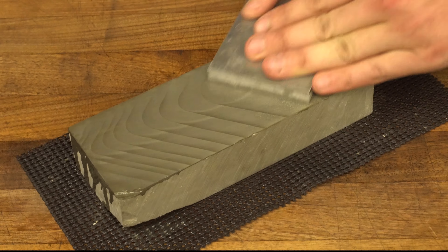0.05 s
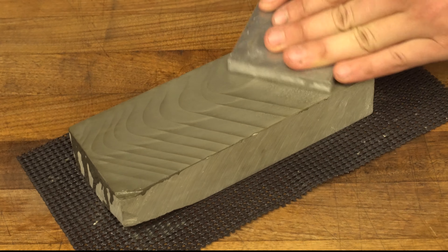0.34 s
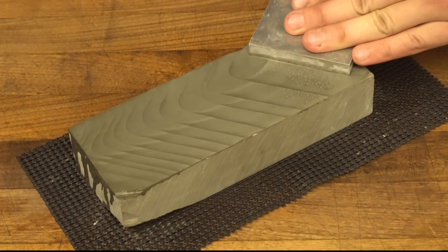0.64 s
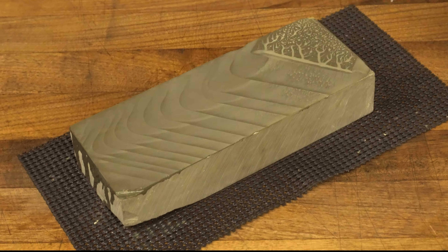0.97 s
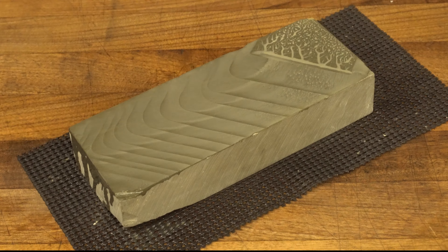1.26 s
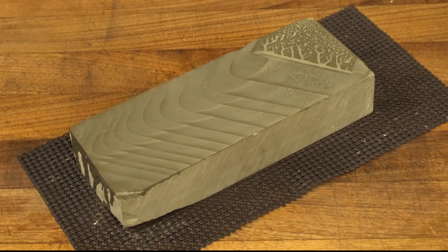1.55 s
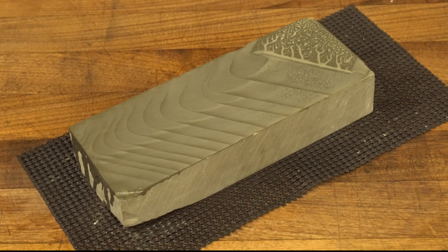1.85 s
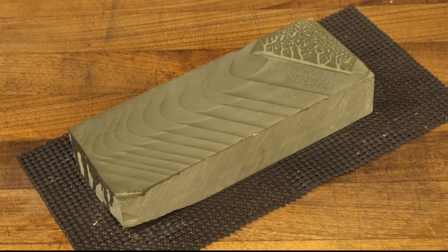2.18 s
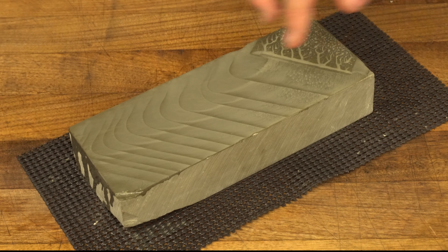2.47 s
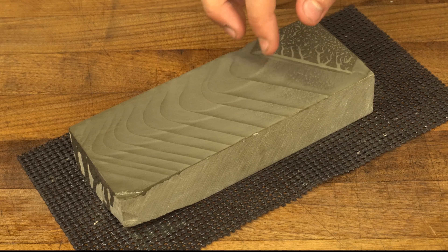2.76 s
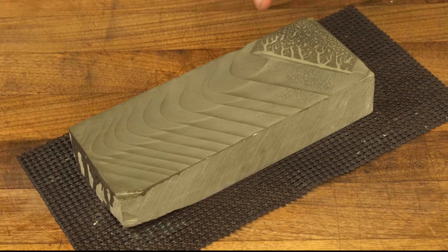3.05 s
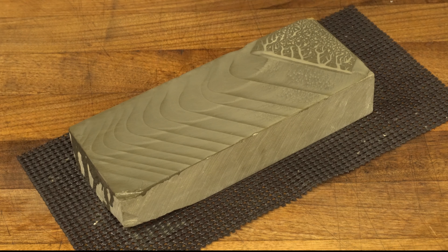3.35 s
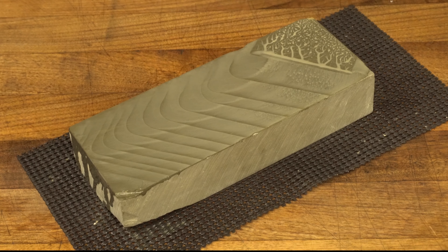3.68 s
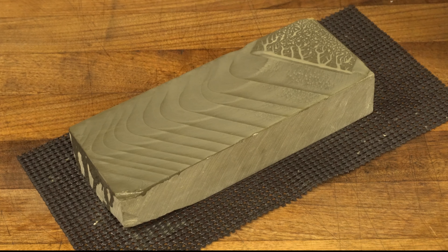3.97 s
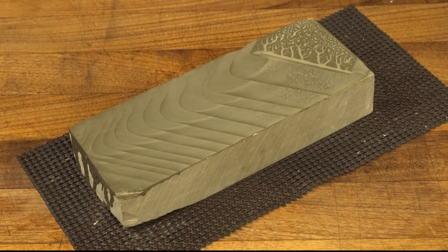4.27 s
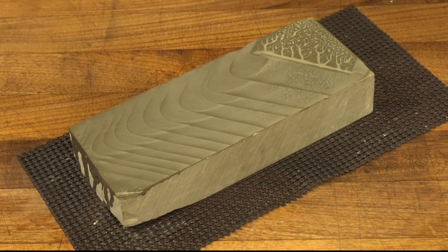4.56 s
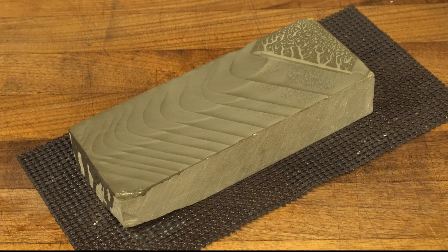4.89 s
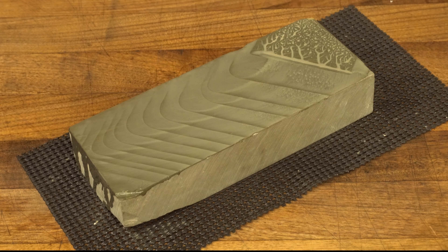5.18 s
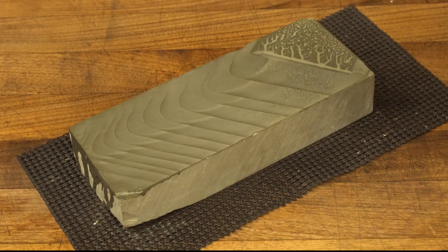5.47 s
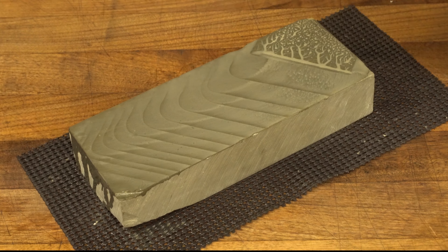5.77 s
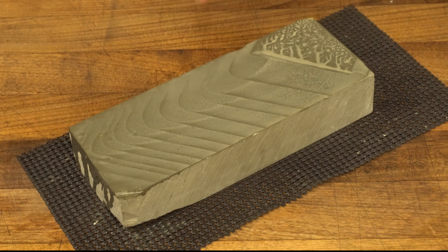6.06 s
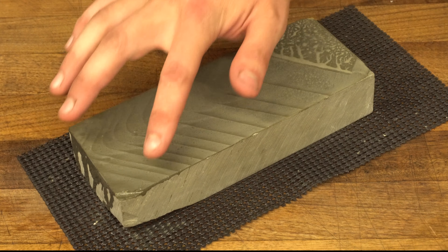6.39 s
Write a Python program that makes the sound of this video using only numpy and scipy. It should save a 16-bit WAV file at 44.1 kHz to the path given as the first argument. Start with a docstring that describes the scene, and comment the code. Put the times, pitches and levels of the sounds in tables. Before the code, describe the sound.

Close up in a small room, a slab is rubbed over a wet whetstone in three quick, gritty strokes and lifted off. After a pause, two knocks set it down on a wooden bench. Later something heavier lands with a thud and rocks quickly to rest. A light shuffle, small wet clicks and a short, sputtering hiss follow, over faint room noise.

```python
"""A small room, close to a wooden bench. A small slab is rubbed in slurry on a whetstone for three short
strokes and lifted off; crushed grit excites the hollows beneath it. Two knocks set it down, ringing the
bench's modes. Something heavier follows, rocks to rest and sets the bench swaying. Then come a light
shuffle, a run of small clicks as wet films part, and a short, sputtering hiss."""
import sys
import numpy as np
from scipy import signal
from scipy.io import wavfile
from scipy.ndimage import uniform_filter1d

SR = 44100
rng = np.random.default_rng(int(sys.argv[2]) if len(sys.argv) > 2 else 0)


def to_wav(sig):
    """Store sig (one row per channel, or 1-D mono) as 16-bit WAV at the path in sys.argv[1].

    Samples outside -1..1 are clipped; the rate is SR.
    """
    pcm = np.clip(np.atleast_2d(sig), -1, 1) * 32767
    pcm = np.round(pcm).astype(np.int16)
    wavfile.write(sys.argv[1], SR, pcm.T)  # frames by channels


N = 283563
T = np.arange(N) / SR

# Spectra of the room's air and of a low rumble. Each row: frequency in Hz, relative density in dB.
AIR_SPECTRUM = [(88, -15.5), (150, -5.5), (221, -6.5), (267, -0.5), (337, -7.5), (401, -5), (477, -15),
                (535, 0), (624, -25.5), (687, -16), (1010, -3.5), (1670, -17.5), (2230, -15.5), (2700, -19),
                (11500, -46.5), (15000, -58)]
RUMBLE_SPECTRUM = [(18, -15), (30, -2.5), (48, 3.5), (62, 4), (75, -7), (100, -5.5), (140, -9.5),
                   (250, -12), (500, -55)]
# The slow ebb of the rumble. Each row: time in seconds, relative level in dB.
RUMBLE_EBB = [(0, -55.5), (.85, -52), (1.2, -55), (3.5, -60.5), (4.4, -60.5), (6.2, -59)]
# Broad tones in the air. Each row: frequency in Hz, width in Hz, level in dB.
AIR_TONES = [(528, 62, -77.5), (968, 21, -82)]
# Reverberation of the room. Each row: frequency in Hz, time to decay by 60 dB (t60) in seconds.
ROOM_DECAY = [(100, 0.83), (300, 0.56), (1000, 0.49), (3000, 0.48), (5500, 0.46), (8000, 0.34),
              (14000, 0.29)]
# Spectrum of the rubs and of a click's snap. Each row: frequency in Hz, relative density in dB.
HISS_SPECTRUM = [(240, -47), (400, -6), (504, -2), (635, -11), (890, 0), (1050, -4), (1400, -1),
                 (3000, -0.5), (5400, -2), (6600, -8), (8500, -12), (10500, -7.5), (14400, -13.5),
                 (15800, -14)]
# Brief rubs and hisses. Each row: start and end in seconds, level in dB, rise and fall in seconds,
# upper edge in Hz.
RUBS = [(0.757, 0.821, -50.5, 0.035, 0.031, 4870), (3.38, 3.456, -67.5, 0.038, 0.056, 9000),
        (4.598, 4.807, -59, 0.044, 0.15, 7500), (5.077, 5.271, -61.5, 0.091, 0.063, 5980),
        (5.155, 5.225, -59, 0.0097, 0.032, 14100), (5.436, 5.536, -67.5, 0.03, 0.043, 8050),
        (5.773, 6.026, -48.5, 0.018, 0.028, 17300), (6.004, 6.28, -54, 0.04, 0.41, 6240)]
# Wet slips. Each row: start and length in seconds, level in dB, frequency in Hz.
SQUEAKS = [(5.681, 0.01, -63.5, 3150), (6.026, 0.024, -55.5, 5230), (6.136, 0.0093, -55.5, 5400),
           (6.243, 0.014, -68, 5500)]
# Parting wet films. Each row: start in seconds, level in dB, cavity frequency in Hz, t60 in seconds,
# snap relative to the ring in dB, clarity of pitch from 0 to 1.
WET_CLICKS = [(4.18, -31, 1690, 0.014, -7.5, 0.33), (4.2373, -28, 2444, 0.021, -35, 0.71),
              (4.2373, -36, 3200, 0.012, -35, .5), (4.2373, -34.5, 1350, 0.03, -30, 0.45),
              (4.2375, -38.5, 4250, 0.014, -35, 0.87), (5.1775, -33.5, 3750, .012, -14, 0.7),
              (5.7346, -26.5, 3540, 0.016, -2, .5), (5.746, -28, 3800, .014, -1, .45),
              (5.763, -41, 3600, .02, -8, 0.3), (5.7799, -28.5, 1490, 0.025, 0, 0.38),
              (5.8015, -29, 790, 0.031, -2, 0.4), (5.8184, -22.5, 2110, 0.025, -2.5, 0.53),
              (5.8321, -27.5, 2190, 0.021, 1.5, 0.5), (5.8323, -34.5, 750, 0.039, -20, .35),
              (5.842, -33.5, 2150, 0.03, -5, 0.5), (6.069, -42, 4650, 0.021, -5, .35),
              (6.085, -42.5, 4200, 0.018, -4, .3), (6.153, -39, 4000, 0.022, 4, .35),
              (6.1546, -38.5, 1200, 0.033, -4, 0.25), (6.171, -43.5, 3400, .016, 0, .35),
              (6.21, -33.5, 1764, 0.025, -22, 0.25), (6.2357, -35.5, 5000, 0.015, -16, 0.63)]
# Pushes that sway the bench. Each row: start in seconds, level in dB, frequency in Hz, t60 in seconds.
PUSHES = [(4.512, -38, 26.9, 4.5), (5.108, -36.5, 30.6, 0.63), (5.85, -40.5, 29.7, 0.85)]
# Modes of the wooden top with the stone on it, and of the frame below.
# Each row: frequency in Hz, relative level in dB, t60 in seconds.
TOP_MODES = [(176.3, -7.5, 0.3), (207.6, 5.5, 0.21), (259, -2.5, .13), (279.5, 1.5, 0.2), (350.3, -7, 0.45),
             (372, -8, 0.38), (445, -1, 0.15), (489, -6, 0.25), (517, -10.5, 0.42), (734, -2.5, 0.18),
             (826, -4, 0.2), (1005, -5, 0.17), (1070, 1.5, 0.05), (1295, -5, 0.14), (1480, -14, 0.17),
             (1570, -10, 0.21), (2174, -10, 0.22), (2430, -15, 0.2), (1184, -9, 0.14), (3954, -7, 0.15),
             (3970, -10, 0.15)]
FRAME_MODES = [(54.6, -12.5, 0.67), (78.5, -13.5, 0.27), (109.7, -5, 0.58), (132.9, -2, 0.43),
               (226.4, -11.5, 0.34), (311.2, -8, 0.28), (502, -10, 0.22), (1150, -11, 0.16),
               (1330, -9, .15)]
# Spectrum of a blow's clack. Each row: frequency in Hz, relative gain in dB.
CLACK_SPECTRUM = [(110, -37), (190, 5), (320, 2), (460, 2), (620, -2.5), (800, 0), (1500, -2), (2600, -6),
                  (4000, -9), (5600, -9.5), (7500, -17), (11000, -16.5), (15700, -24)]
# Blows on the bench. Each row: start in seconds, gain in dB, hardness as a cutoff in Hz, weights of top
# and frame in dB, lower edge of the top's ring in Hz, rebound from 0 to 1, first-contact weight in dB.
BLOWS = [(1.8993, -16, 2730, -8.5, -25, 235, 0.26, 15), (2.1145, -15, 6200, -8.5, -23.5, 140, 0.06, 15.5),
         (2.1187, -23.5, 6860, -15, -11, 130, 0, 20), (2.583, -27.5, 330, -10.5, -14, 140, 0, 14.5),
         (4.5127, -25.5, 1900, -5.5, 1.5, 200, 0.13, 15.5), (4.5227, -27.5, 2600, -11, 4, 200, 0, 13),
         (4.5269, -23.5, 3930, -20, 0, 200, 0.02, 16.5), (4.545, -28, 1300, -8, 0, 250, 0, 13),
         (5.0988, -46.5, 2600, -11, -1.5, 130, 0.3, 14), (5.16, -46.5, 598.6, 2, -9, 129.5, 0.2, 10)]
# Resonances of the whetstone on the bench, and of the slab.
# Each row: frequency in Hz, width in Hz, level in dB.
STONE_MODES = [(57, 16, -55.5), (793, 250, -59.5)]
SLAB_MODES = [(6680, 110, -74), (12070, 200, -71.5), (13380, 160, -76.5)]
# Spectra of the grinding and of its fine fizz. Each row: frequency in Hz, relative density in dB.
GRIND_SPECTRUM = [(200, -17), (400, 5.5), (620, -15), (790, -10), (1200, -15), (2100, -4), (3300, -6),
                  (4300, -3), (5600, -4), (6400, -12), (8000, -19), (15000, -39)]
FIZZ_SPECTRUM = [(3000, -20), (6000, 1), (7500, -1.5), (9600, -0.5), (11000, -1.5), (11600, -5),
                 (14800, -6), (15700, -16)]
# Strokes of the slab, each starting where the last ends. Each row: fastest moment and end in seconds,
# weights of grinding, fizz and rasp in dB, rasp pitch at full speed in Hz, its glide in Hz per second,
# place reached on the stone from -1 to 1.
STROKES = [(0.117, 0.226, -51.5, -57, -58, 1680, -1200, 0.73), (0.41, 0.494, -51, -57, -53, 1640, 100, -.9),
           (0.627, 0.705, -49.5, -62, -55.5, 1480, -2000, 0.13)]


def amp(db):
    """Amplitude grows tenfold for every 20 dB."""
    return 10 ** (np.asarray(db) / 20)


def unit(x):
    """Normalisation to an rms of 1."""
    return x / np.sqrt(np.mean(x ** 2) + 1e-20)


def read(points, hz):
    """Interpolation on a logarithmic frequency axis."""
    f, value = np.transpose(points)
    return np.interp(np.log(hz + 1), np.log(f + 1), value)


def add(mix, start, sound):
    """Superposition: a sound joins the mix at its start time in seconds."""
    part = mix[max(round(start * SR), 0):][:len(sound)]
    part += sound[:len(part)]


def band(x, hz, kind):
    """A second-order Butterworth filter, low-pass or high-pass."""
    return signal.sosfilt(signal.butter(2, min(hz, .45 * SR), kind, fs=SR, output="sos"), x)


def colour(x, points, tilt_db=0):
    """A minimum-phase filter imposes a spectrum, tilted about 2 kHz by tilt_db per octave."""
    hz = abs(np.fft.fftfreq(8192, 1 / SR))
    octaves = np.log2(np.maximum(hz, 300) / 2000)
    log_gain = np.log(amp(read(points, hz) + tilt_db * octaves))
    taps = np.fft.ifft(np.exp(np.conj(signal.hilbert(log_gain)))).real
    return signal.oaconvolve(x, taps[:len(taps) // 2])[:len(x)]


def resonate(x, hz, width):
    """Forced resonance: a double pole passes a band about hz, which may vary in time."""
    carrier = np.exp(2j * np.pi * np.cumsum(hz * np.ones(len(x))) / SR)
    pole = np.exp(-np.pi * abs(width) / SR)
    baseband = signal.lfilter([(1 - pole) ** 2], [1, -2 * pole, pole * pole], x / carrier + 1e-18)
    return 2 * (carrier * baseband).real


def ring(modes, t):
    """Free vibration is a sum of exponentially damped sines."""
    return sum(amp(db - 60 * t / t60) * np.sin(2 * np.pi * hz * t) for hz, db, t60 in modes)


def grit(per_s, spread_db):
    """Shot noise: tiny fractures of uneven size occur at random instants."""
    size = amp(spread_db * np.minimum(rng.exponential(1, N), 4)) * rng.standard_normal(N)
    return unit(size * (rng.random(N) < per_s / SR))


def background(air_db=-60.1):
    """Ambient noise: steady air with two broad tones, over a rumble and distant rush that ebb together."""
    air = amp(air_db) * unit(colour(rng.standard_normal(N), AIR_SPECTRUM))
    tones = sum(amp(db) * unit(resonate(rng.standard_normal(N), hz, width))
                for hz, width, db in AIR_TONES)
    rumble = amp(1) * unit(colour(rng.standard_normal(N), RUMBLE_SPECTRUM))
    rush = amp(-2.7) * unit(resonate(rng.standard_normal(N), hz=900, width=1040))
    ebb = amp(np.interp(T, *np.transpose(RUMBLE_EBB)))
    return air + tones + ebb * (rumble + rush)


def room_tail(build_s=0.016, reflections_per_s=5000):
    """Reverberation: sparse reflections build up quickly and decay soonest in the treble."""
    taps = rng.choice([-1., 1.], SR) * (rng.random(SR) < reflections_per_s / SR)
    taps *= np.minimum(T[:SR] / build_s, 1) ** 2
    hz, t, spectrum = signal.stft(taps, SR, nperseg=256)
    decay = amp(-60 * t / read(ROOM_DECAY, hz)[:, None])
    tail = signal.istft(spectrum * decay, SR, nperseg=256)[1][:SR]
    return tail / np.linalg.norm(tail)


def rubs():
    """Friction noise: short swells of fine-grained hiss."""
    out = np.zeros(N)
    for start, end, db, rise, fall, top_hz in RUBS:
        swell = np.clip(np.minimum((T - start) / rise, (end - T) / fall), 0, 1)
        hiss = colour(grit(per_s=26000, spread_db=1.7), HISS_SPECTRUM)
        out += amp(db) * swell * unit(band(hiss, top_hz, "low"))
    return out


def squeaks(width_hz=1100):
    """Each tiny wet slip briefly excites a single resonance."""
    out = np.zeros(N)
    for start, length, db, hz in SQUEAKS:
        swell = np.sin(np.pi * np.arange(0, 1, 1 / (length * SR)))
        slip = resonate(rng.standard_normal(len(swell)), hz, width_hz)
        add(out, start, amp(db) * unit(slip * swell))
    return out


def sputter(start=5.7848, gap_s=0.0049, db=-26.5, step_db=-1.5):
    """A decaying pulse train opens the hiss: four evenly spaced rows of wet clicks."""
    hz, t60, snap_db, clarity = 4400, 0.014, -6, 0.2
    return [(start + k * gap_s, db + k * step_db, hz, t60, snap_db, clarity) for k in range(4)]


def wet_clicks(snap_t60=0.0055, rise_s=0.00028):
    """Cavity resonance: a wet film parts with a bright snap and a small cavity rings roughly."""
    out, t = np.zeros(N), T[:SR // 10]
    for start, db, hz, t60, snap_db, clarity in WET_CLICKS + sputter():
        cavity_noise, snap_noise = rng.standard_normal((2, len(t)))
        fade, snap_fade = amp(-60 * t / t60), amp(-60 * t / snap_t60)
        pure = np.sin(2 * np.pi * hz * t) * fade
        rough = unit(resonate(cavity_noise, hz, width=0.86 * hz) * fade) * fade.std()
        cavity = band(clarity * pure + (1 - clarity) * rough, 0.4 * hz, "high")
        cavity = band(band(cavity, 1.66 * hz, "low"), 1.66 * hz, "low")
        bright = colour(snap_noise, HISS_SPECTRUM, tilt_db=2)
        snap = amp(snap_db) * unit(bright * snap_fade) * snap_fade.std()
        add(out, start, amp(db) * (cavity + snap) * (1 - np.exp(-t / rise_s)))
    return out


def bench_sway(rise_s=0.046):
    """Damped oscillation: the whole bench rocks at a low frequency after a push."""
    out = np.zeros(N)
    for start, db, hz, t60 in PUSHES:
        add(out, start, ring([(hz, db, t60)], T) * (1 - np.exp(-T / rise_s)))
    return out


def rocking(start=4.556, gap_s=0.048, shrink=0.99, db=-29, step_db=-1.7):
    """Dissipation: a heavy thing rocks to rest in four ever quicker, weaker blows."""
    gaps = gap_s * shrink ** np.arange(4)
    contact = (1550, -10.5, -6, 200, 0, 0)  # as in BLOWS, from hardness onward
    return [(start + gaps[:k].sum(), db + k * step_db, *contact) for k in range(4)]


def knocks(clack_t60=0.068, rebound_s=0.00155, rebound_edge_hz=1300):
    """Impact excites the bench's modes and a clack that fills the room; soft contact dulls them all."""
    out, t = np.zeros(N), T[:SR]
    top, frame = amp(-8) * ring(TOP_MODES, t), amp(-7) * ring(FRAME_MODES, t)
    for start, db, hard_hz, top_db, frame_db, low_hz, rebound, contact_db in BLOWS + rocking():
        scatter = rng.standard_normal(SR) * amp(-60 * t / clack_t60) + amp(18) * room_tail()
        scatter[0] = amp(contact_db)
        clack = amp(4) * colour(scatter, CLACK_SPECTRUM)
        body = amp(top_db) * band(top, low_hz, "high") + clack + amp(frame_db) * frame
        pole = np.exp(-2 * np.pi * hard_hz / SR)
        softened = signal.lfilter([1 - pole], [1, -pole], body)
        blow = amp(db) * band(softened, 7 * hard_hz, "low")
        add(out, start, blow)
        # landing on one edge, a slab kicks back a moment later, more dully
        add(out, start + rebound_s, -rebound * band(blow, rebound_edge_hz, "low"))
    return out


def slab_motion(surge=1.25):
    """Reciprocating motion: the current stroke, the speed from 0 to 1 and the place on the stone."""
    fastest, end, *_, reached = np.transpose(STROKES)
    turns = np.append(0, end)
    stroke = np.minimum(np.searchsorted(end, T), len(end) - 1)
    speeding = (T - turns[stroke]) / (fastest - turns[:-1])[stroke]
    slowing = (end[stroke] - T) / (end - fastest)[stroke]
    speed = np.sin(np.pi / 2 * np.clip(np.minimum(speeding, slowing), 0, 1)) ** surge
    return stroke, speed, np.interp(T, turns, np.append(0, reached))


def flicker(x, depth_db, patch_bins=4, patch_frames=18):
    """Random modulation: patches of the spectrum swell and sink. Only the first second is kept."""
    spectrum = signal.stft(x[:SR], nperseg=512, noverlap=384)[2]
    patches = uniform_filter1d(rng.standard_normal(spectrum.shape), patch_bins, axis=0)
    patches = unit(uniform_filter1d(patches, patch_frames, axis=1))
    modulated = signal.istft(spectrum * amp(depth_db * patches), nperseg=512, noverlap=384)[1]
    return np.pad(unit(modulated[:SR]), (0, N - SR))


def wandering(hz, share=0.013, drift_s=0.044):
    """Frequency modulation: the film of slurry is uneven, so a hollow's pitch drifts."""
    drift = unit(uniform_filter1d(rng.standard_normal(N), round(drift_s * SR)))
    return hz * (1 + share * drift)


def hollows(stroke, speed, place, grind_db, fizz_db, rasp_db):
    """Cavity resonance: grit excites the hollows under the slab, whose pitches shift as it travels."""
    fastest, end, *_, pitch_hz, glide, _ = np.transpose(STROKES)
    rasp_hz = pitch_hz[stroke] + glide[stroke] * (np.minimum(T, end[-1]) - fastest[stroke])
    rasp_hz *= 1 + 0.04 * (1 - speed)  # the rasp rises at a turn
    push_db = grind_db - grind_db.max()
    # Each row: level in dB, frequency in Hz, width in Hz.
    resonances = [(-53.5 + 5.5 * push_db, 3950, 800),  # opens only on the hardest push
                  (rasp_db + 1, rasp_hz, 290),
                  (grind_db - 0.3 + push_db, 3280 * (1 + 0.06 * place), 800),
                  (fizz_db + 2 - 7 * (1 - speed), 5200 * (1 + 0.062 * place), 680)]
    out = np.zeros(N)
    for db, hz, width in resonances:
        hollow = resonate(grit(per_s=9000, spread_db=-2), wandering(hz), width)
        out += amp(db) * flicker(hollow, depth_db=2.2)
    return out


def grinding(lift_s=0.728, slab_fade_s=0.037, stone_fade_s=0.1):
    """Abrasion: grit is crushed under the slab, louder with speed; hollows, stone and slab resonate."""
    fastest, _, grind, fizz, rasp, *_ = np.transpose(STROKES)
    stroke, speed, place = slab_motion()
    # each layer sinks where the slab turns round
    grind_db = np.interp(T, fastest, grind) - 5 * (1 - speed)
    fizz_db = np.interp(T, fastest, fizz) - 4 * (1 - speed)
    rasp_db = np.interp(T, fastest, rasp) - 13.5 * (1 - speed)
    out = hollows(stroke, speed, place, grind_db, fizz_db, rasp_db)
    coarse = resonate(grit(per_s=900, spread_db=1.5), hz=5000, width=1500)
    out += amp(grind_db - 12) * speed * unit(coarse)  # coarse grains crack at speed
    broad = colour(grit(per_s=18000, spread_db=-0.5), GRIND_SPECTRUM)
    out += amp(grind_db - 6) * flicker(broad, depth_db=2.2)
    stone = sum(amp(db) * unit(resonate(grit(per_s=5000, spread_db=-3), hz, width))
                for hz, width, db in STONE_MODES)
    fine = grit(per_s=24000, spread_db=0)
    out += amp(fizz_db - 1) * flicker(colour(fine, FIZZ_SPECTRUM), depth_db=2.6)
    out += sum(amp(db) * flicker(resonate(fine, hz, width), depth_db=2.6) for hz, width, db in SLAB_MODES)
    face_contact = np.clip((lift_s - T) / slab_fade_s, 0, 1)
    edge_contact = np.clip(1 + (lift_s - T) / stone_fade_s, 0, 1)  # one edge drags a moment longer
    return out * face_contact + stone * edge_contact


def scene(near_room_db=-17):
    """Direct sound dominates near a source, so the small sounds stay nearly dry beside the knocks."""
    near = grinding() + wet_clicks() + squeaks() + rubs()
    reverberation = amp(near_room_db) * signal.fftconvolve(near, room_tail())[:N]
    return (knocks() + near + reverberation + bench_sway() + background())[None]


def record(dry, edge_hz=15950):
    """Band limiting: a steep linear-phase low-pass removes the highest treble."""
    taps = signal.firwin(511, edge_hz, window=("kaiser", 9), fs=SR)
    return signal.oaconvolve(dry, taps[None], "same")


dry = scene()
out = record(dry)
to_wav(out)
```